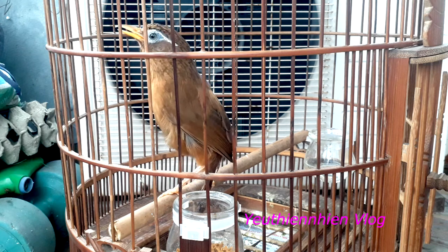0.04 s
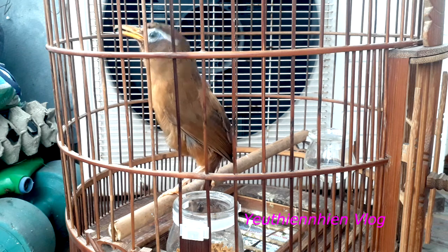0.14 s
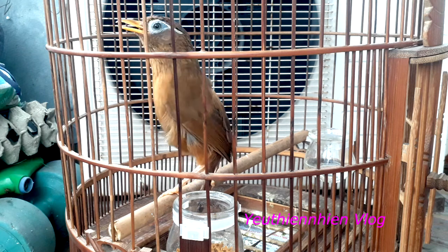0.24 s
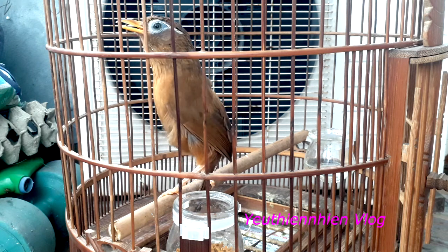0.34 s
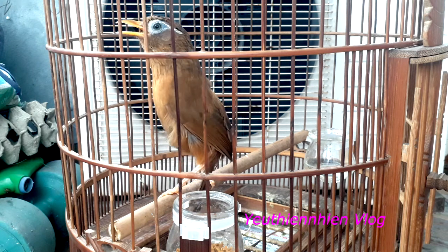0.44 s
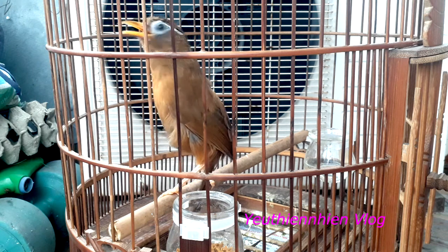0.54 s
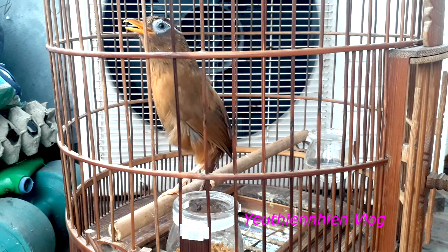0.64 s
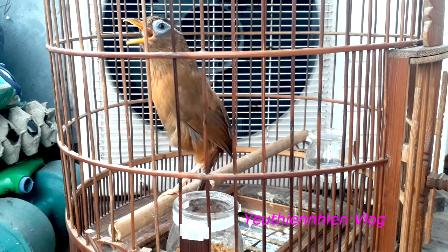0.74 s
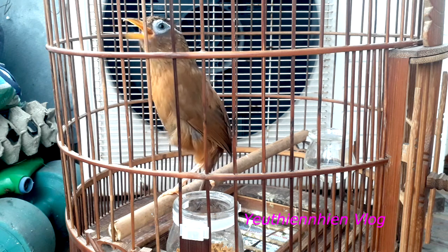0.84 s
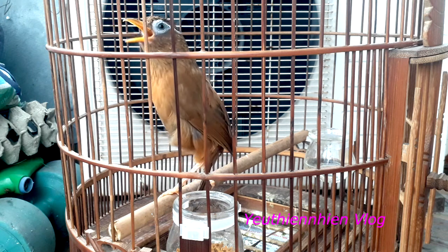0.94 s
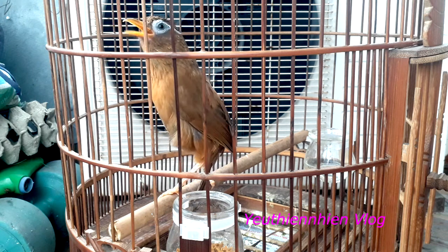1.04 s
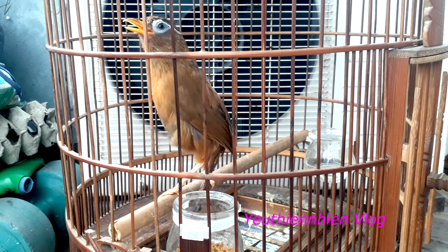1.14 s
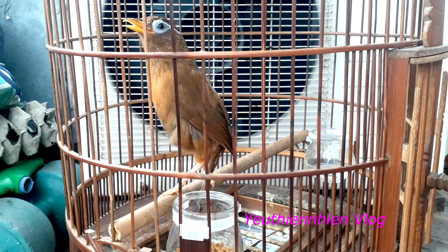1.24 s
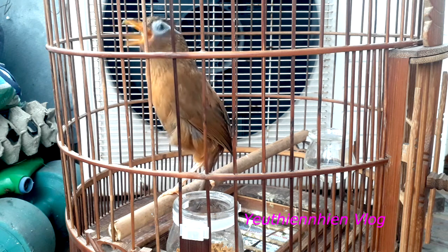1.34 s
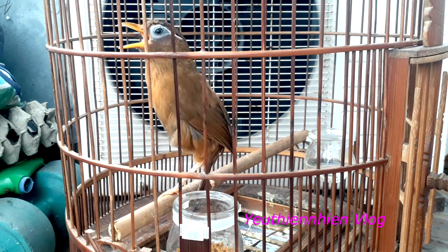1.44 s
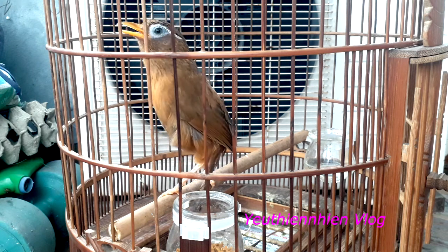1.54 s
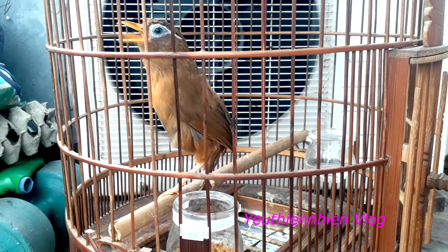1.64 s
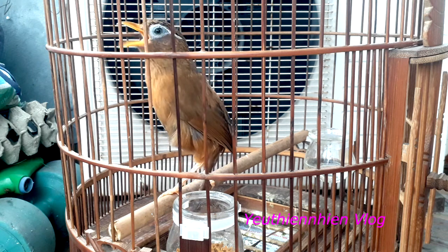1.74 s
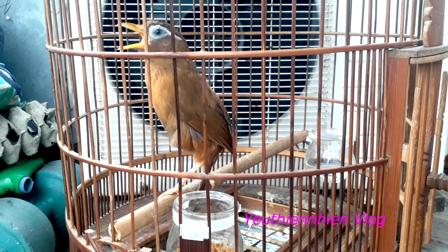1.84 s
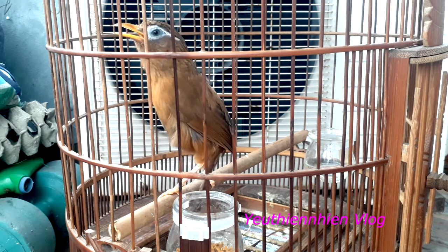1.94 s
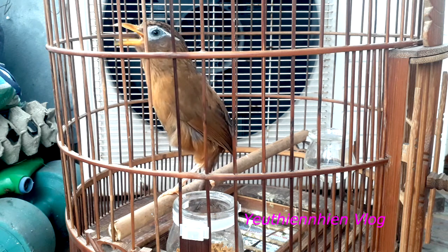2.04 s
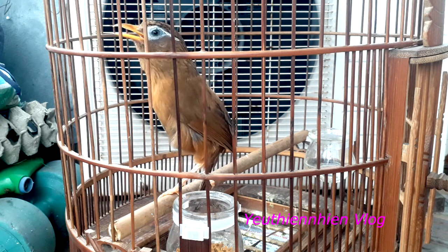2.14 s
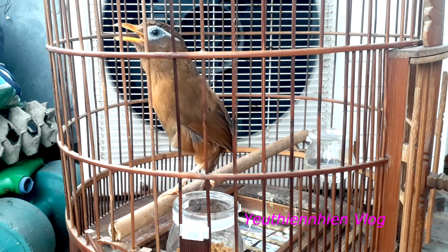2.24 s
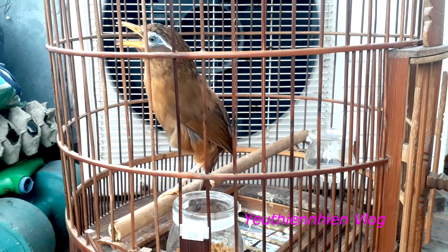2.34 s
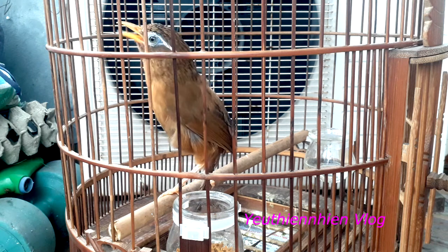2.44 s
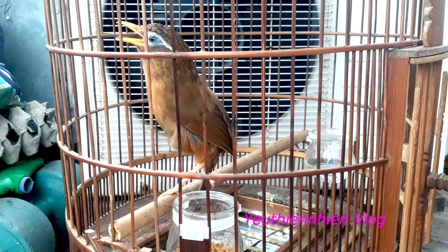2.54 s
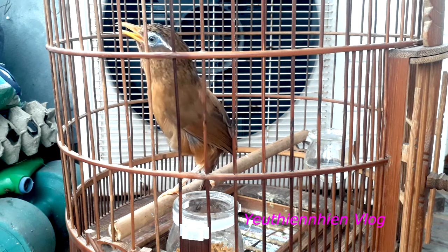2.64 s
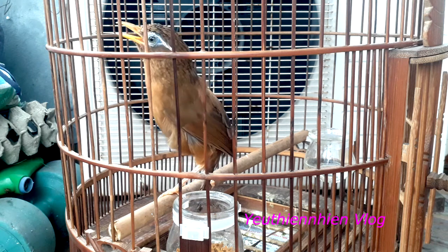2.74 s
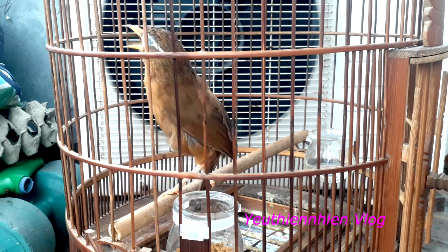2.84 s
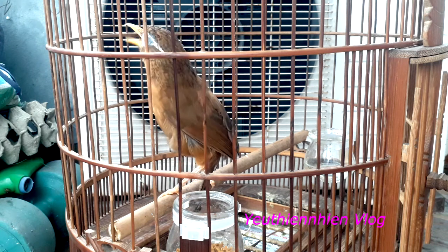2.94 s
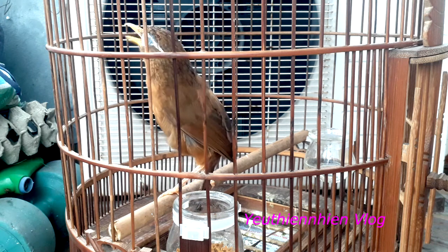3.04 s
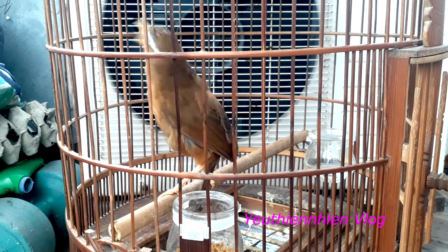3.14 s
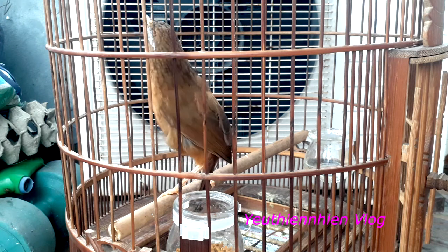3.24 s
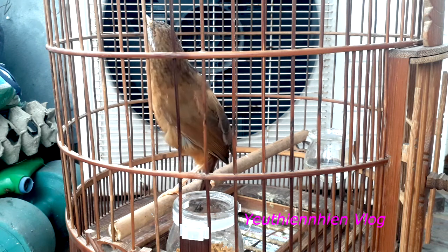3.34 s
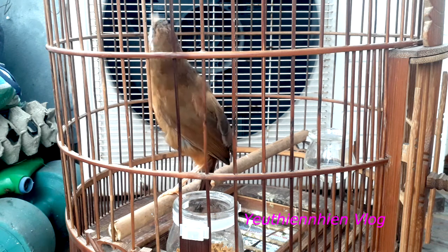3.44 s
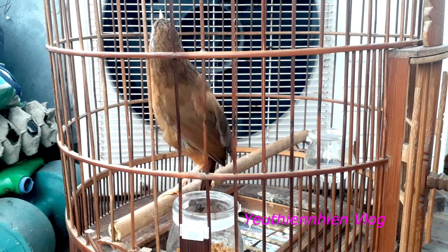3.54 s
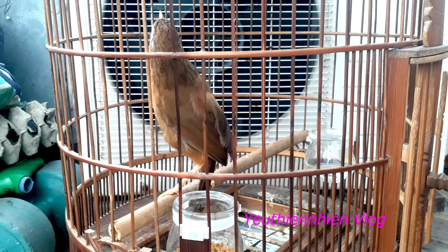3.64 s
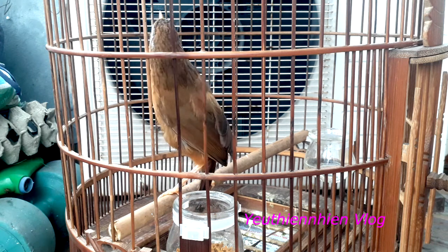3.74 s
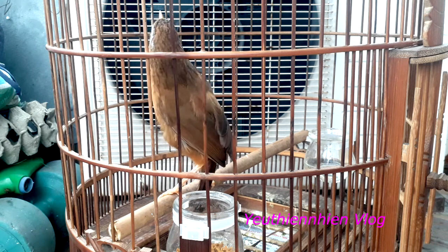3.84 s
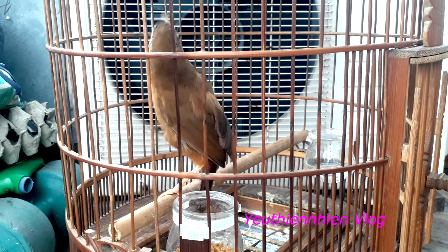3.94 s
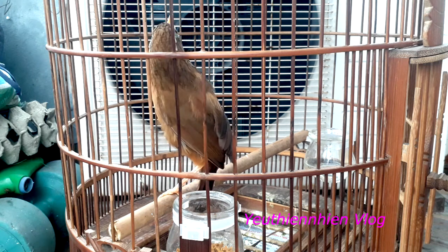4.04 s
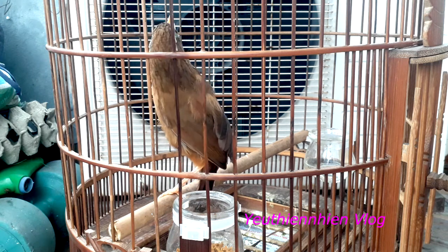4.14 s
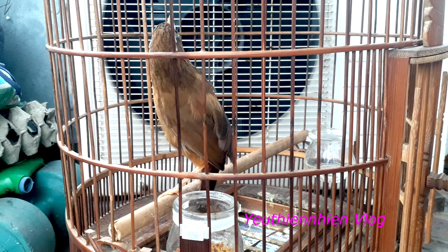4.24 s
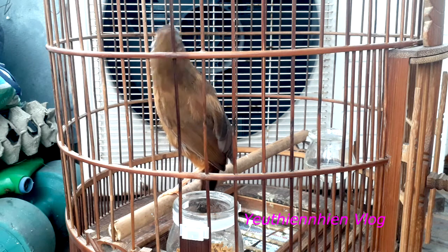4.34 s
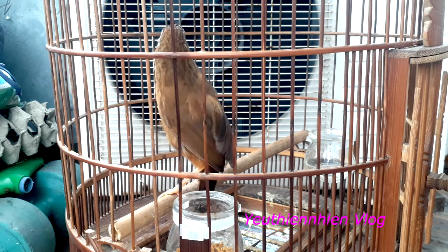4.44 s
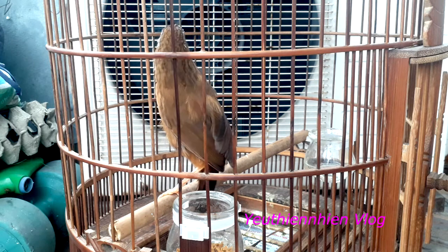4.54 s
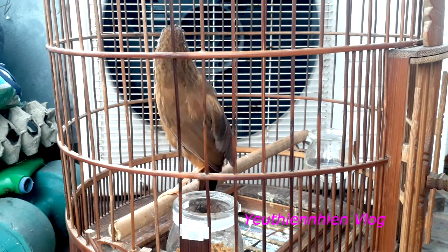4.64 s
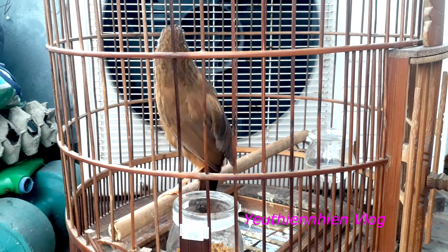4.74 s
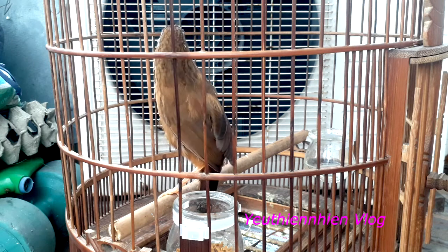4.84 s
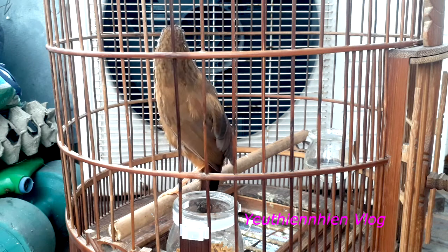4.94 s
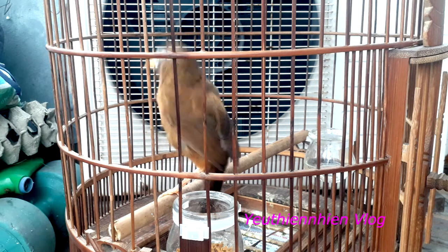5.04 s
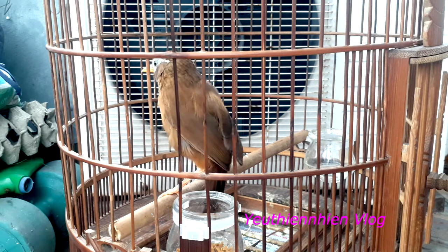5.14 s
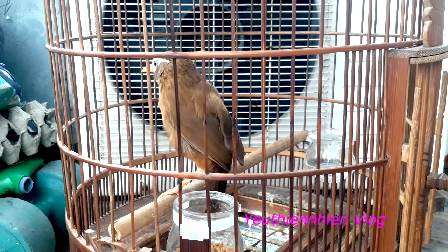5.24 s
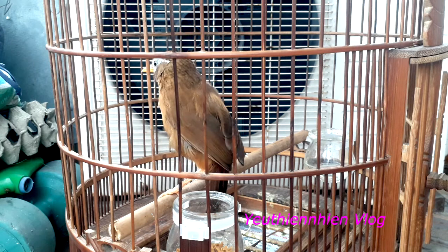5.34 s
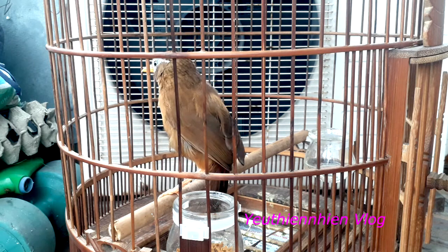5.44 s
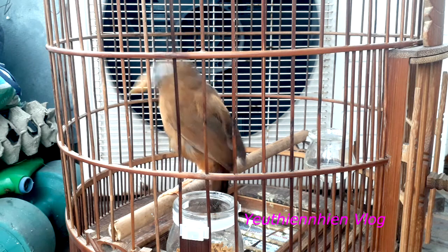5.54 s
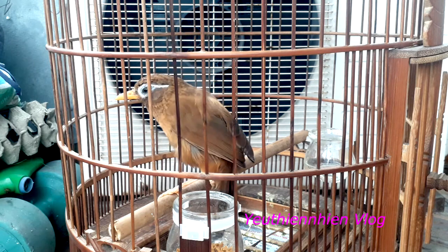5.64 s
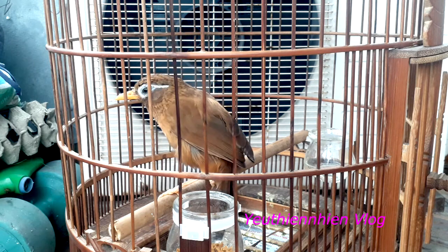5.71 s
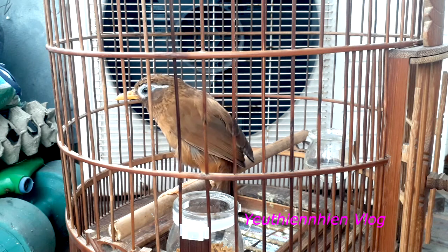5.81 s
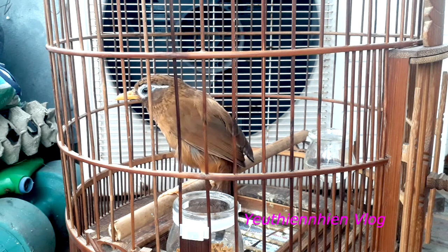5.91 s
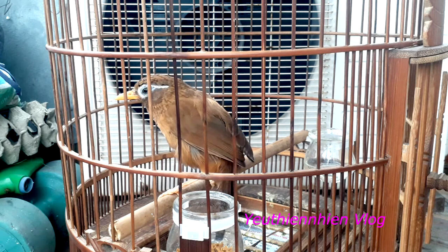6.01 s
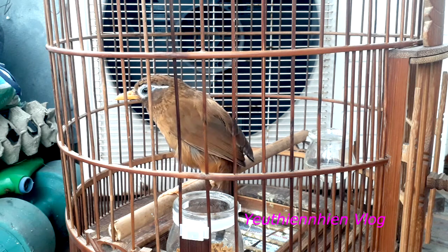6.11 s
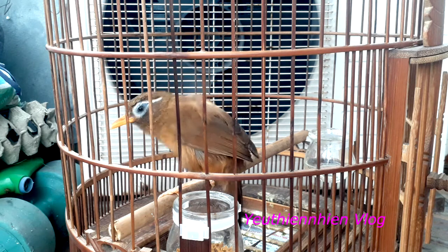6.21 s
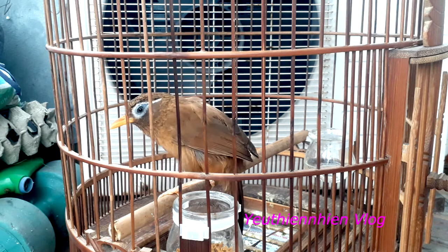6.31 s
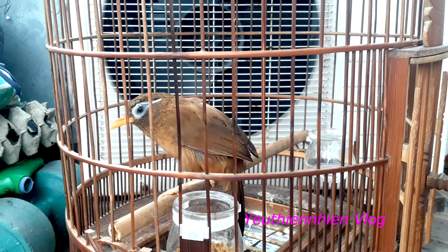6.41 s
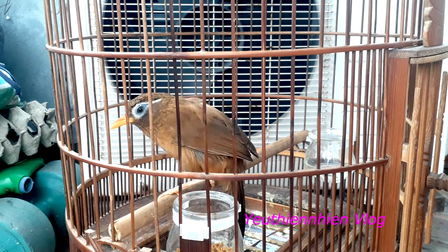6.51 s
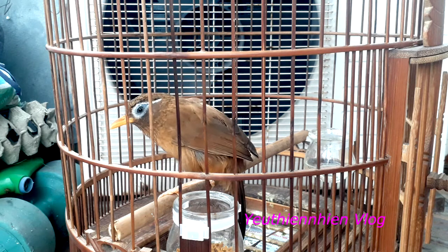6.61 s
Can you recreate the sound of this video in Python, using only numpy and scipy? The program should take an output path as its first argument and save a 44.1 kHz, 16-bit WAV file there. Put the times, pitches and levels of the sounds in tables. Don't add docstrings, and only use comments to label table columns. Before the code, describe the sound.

Loud, piercing birdsong fills the first two thirds: about twenty short whistles, sliding up and down, buzzing and fluttering, separated by tiny gaps and slapping off nearby hard walls. Thin far machine whines hide beneath. Then the singer falls silent and the soft street rumble is exposed, a distant bird warbles and others chirp in echo, an engine murmurs far away, and claws tick on a dry perch. Mono, close phone pickup.

```python
import sys
import numpy as np
from scipy import signal
from scipy.fft import rfft, irfft
from scipy.io import wavfile
from scipy.ndimage import uniform_filter1d, minimum_filter1d

SR = 44100
rng = np.random.default_rng(int(sys.argv[2]) if len(sys.argv) > 2 else 0)


def undo_db(level):
    steps = np.asarray(level, float) / 20
    return 10 ** steps


def wrap_up_sound(samples):
    columns = np.atleast_2d(samples).T
    tamed = np.clip(columns, -1, 1)
    steps = np.round(tamed * 32767).astype(np.int16)
    wavfile.write(sys.argv[1], SR, steps)


N = 294147
TOP_HZ = 15700


def level(x, db):
    return x * undo_db(db) / np.sqrt(np.mean(x ** 2))


def walk(rate):
    k = int(SR / rate)
    held = np.repeat(rng.standard_normal(N // k + 1), k)
    return 1.3 * uniform_filter1d(uniform_filter1d(held, k), k)[:N]


def colour(x, shape):
    hz, db = np.transpose(shape)
    f = np.maximum(np.arange(N // 2 + 1) * SR / N, 1)
    return irfft(rfft(x) * undo_db(np.interp(np.log(f), np.log(hz), db)), N)


def tail(x, t60, rise):
    t = np.arange(SR) / SR
    answer = rng.standard_normal(SR) * (1 - np.exp(-t / rise)) * undo_db(-60 * t / t60)
    return signal.fftconvolve(x, answer / np.sqrt(np.sum(answer ** 2)))[:N]


def town():
    # time in seconds, rumble in dB.
    traffic = [(0, -49.5), (.6, -51), (1.2, -51), (1.701, -51), (2.1, -50), (2.699, -52), (3.599, -51),
               (4.6, -50.5), (5.199, -50), (5.599, -49), (6, -48.5), (6.3, -48.5), (6.67, -48.5)]
    # frequency in Hz, density in dB per Hz.
    spectrum = [(15, -14), (40, -10), (120, 1), (190, -6), (250, -3), (380, -9), (650, -11), (1100, -12),
                (1700, -18), (2400, -19), (3300, -24), (4500, -30), (7000, -35), (9000, -39), (15500, -41)]
    s, rumble_db = np.transpose(traffic)
    swell = np.interp(np.arange(N) / SR, s, rumble_db - np.median(rumble_db))
    noise = level(colour(rng.standard_normal(N), spectrum), -49)
    out = 0
    for hz in 30 * 2. ** np.arange(10):
        band = colour(noise, [(hz / 2, -60), (hz / 3.47, -20), (hz, 0), (hz * 1.9, -2), (hz * 2, -60)])
        out = out + band * undo_db(swell * 2.7 / (1 + hz / 900) + 0.61 * walk(7.6))
    return out


def starting_blip():
    u = np.arange(600) / 600
    phase = 2 * np.pi * np.cumsum(2228 * (.9 + .16 * u)) / SR
    return np.sin(np.pi * u) * (np.sin(phase) + 0.075 * np.sin(2 * phase))


def thrush():
    # kind, start in seconds, length in seconds, low and high Hz of the loud second
    song = [("swell", .098, .1, 1560, 1860, 1.3), ("swell", .3, .278, 1515, 2170, .9),
            ("climb", .68, .165, 1980, 3340, 1.1), ("glide", 0.9128, .209, 1954, 3060, 0.95),
            ("hold", 1.354, .183, 1620, 3244, 0.87), ("rise", 1.61, 0.1, 1830, 2580, 0.52),
            ("hold", 1.749, .195, 1720, 3235, 1), ("dip", 2.053, 0.2, 1930, 2850, 1),
            ("plunge", 2.337, 0.095, 1840, 3300, 0.93), ("dip", 2.518, .202, 1900, 2790, 0.88),
            ("plunge", 2.799, .083, 1760, 3320, 1), ("rise", 2.919, .104, 2120, 2740, 1.4),
            ("plunge", 3.073, .089, 1730, 3260, 1), ("rise", 3.197, .113, 2070, 2690, 1.4),
            ("slide", 3.364, 0.14, 2100, 3200, 1), ("arch", 3.59, 0.16, 1960, 2240, 1.2),
            ("rise", 3.829, 0.12, 2280, 2650, 1.9), ("slide", 4.027, .15, 2150, 3070, 0.95),
            ("rise", 4.271, 0.078, 2740, 2975, 0.2), ("arch", 4.392, .208, 2350, 2680, 0.77)]
    # multiple of the membrane rate, level in dB.
    partials = [(1, -33), (2, 2.5), (3, -24.5), (4, -23.5), (5, -33.5), (6, -38), (7, -41), (8, -41),
                (9, -30.5), (10, -33.5), (11, -37), (12, -51)]
    # frequency in Hz, density in dB per Hz.
    breath = [(1500, -36.5), (3000, -7.5), (4200, -7.5), (5500, -28.5), (7000, -19), (8400, 0), (9800, -21),
              (10600, -34.5), (11600, -16.5), (13000, -28), (14800, -18), (15700, -11)]
    # frequency in Hz, density in dB per Hz.
    torn_air = [(2500, -20), (3800, 0), (7000, 0), (9500, -12), (15000, -18)]
    # frequency in Hz, gain in dB.
    throat = [(1100, -26), (1400, 2), (1600, 0), (3300, 0), (3700, 1)]
    # frequency in Hz, gain in dB.
    beak = [(1000, -2), (1600, -0.5), (3000, 13), (4500, -5), (5500, -5.5), (6500, 0), (7500, -2),
            (8500, 3), (10500, 0), (13000, -8.5), (15000, -15)]
    shapes = { "swell": [(0, 0, -12.5, 3.8), (.1, .1, -5, 4.5), (.25, .25, -3, 6.5), (.4, .8, 0.5, 2.6),
              (.85, 0.95, 1, 2.8), (1, .45, -2.5, 4.5)], "climb": [(0, 0, -17, 2), (.07, .19, -5.5, 3.2),
              (.2, .41, 1, 1.8), (.45, .47, -2, 2.5), (.68, .75, 1.5, 2), (1, 0.95, -4, 5.2)],
              "rise": [(0, 0, -15, 3), (.18, .1, -0.5, 1.9), (.42, .6, -2, 1.323), (.66, .95, 2, 1.2),
              (1, 0.97, -4, 1.9)], "glide": [(0, 0.97, -19.5, .8), (.06, .93, 2.5, .75),
              (.13, .86, -1, .25), (.32, .61, -2, 1.1), (.49, .51, -1, 1), (1, 0.032, -3.5, 3.65)],
              "hold": [(0, 0.93, -6, 3), (.06, .92, 1, 2.3), (.42, .94, 2.5, 1.7), (.64, 1.01, -2.5, .4),
              (.77, .84, 0, 1), (.945, .25, -4.5, 1.2), (1, 0.0062, -13, 1.5)], }
    other_shapes = { "dip": [(0, 0.95, -11.5, 1.5), (.04, 1, -1, .5), (.2, 0.94, 1, .6),
                    (.48, .24, -1, 2.7), (.65, 0, -3, 3.5), (.85, 0.087, -2.5, 3.1), (1, .65, -2, 2.5)],
                    "plunge": [(0, 1.03, -11.5, 2.6), (.13, 1, -2.5, 3.6), (.4, .98, -2.5, 1.8),
                    (.7, .88, 2, 1.1), (.83, .8, 4, 1.3), (1, 0.0094, -14, 1.5)],
                    "slide": [(0, 0.95, -15.5, 3), (.07, 0.97, -0.5, 3), (.25, .93, 0, 1.4),
                    (.5, .65, 0, 1.4), (.75, .33, -4.5, .9), (.93, .1, 1, 2.2), (1, 0, -2, 2.2)],
                    "arch": [(0, -0.703, -12, 2.937), (.08, .6, -3, 1.6), (.22, 1, 0.5, 1.1),
                    (.45, .85, -1, 2.3), (.72, .4, -1, 2.7), (.9, .25, -1, 2.3), (1, 0, -8.5, 2.89)], }
    voices = {"swell": (189, 1.1, 2.5, 0, 3), "climb": (118, .75, 4.5, -1.5, -0.5),
              "glide": (203, 0.6, 3, -.5, 0), "hold": (115, 0.27, -4.5, -.5, -3),
              "rise": (185, .3, -2.5, 1.5, -2), "dip": (168, 0.34, 2, -0.5, -1.5),
              "plunge": (122, 0.3, 0, .3, 2), "slide": (140.5, 0.18, -4.5, -0.5, -2),
              "arch": (183.5, 0.66, 2.5, 1, -1)}
    shut_hz, open_hz = 2150, 2850
    turn_s = 3.24

    low, high, wander, quiver = np.zeros(N), np.zeros(N), walk(70), walk(600)
    hiss = rng.standard_normal(N)
    air = level(colour(hiss, breath), -27.5)
    rasp = level(colour(hiss[::-1], torn_air), -22.5)
    blip = starting_blip()
    courses = {**shapes, **other_shapes}
    for kind, start, length, low_hz, high_hz, rough in song:
        note_db = -9 + 3 * (high_hz - 2765) / 1000
        clean = 1 - rough
        rate_hz, uneven, breath_db, bright_db, deep_db = voices[kind]
        share, *columns = np.transpose(courses[kind])
        i = np.arange(int(start * SR), int((start + length) * SR))
        u = (i / SR - start) / length
        span, db, depth = (uniform_filter1d(np.interp(u, share, c), size=100) for c in columns)
        hz = low_hz + (high_hz - low_hz) * span
        db = db + note_db
        turned = max(start - turn_s, 0)
        depth = rough * np.maximum(depth, 0) / 100
        uneven = min(rough * uneven, 1)

        cycle = 2 * np.pi * np.cumsum(rate_hz * (1 + .4 * uneven * wander[i])) / SR
        slide = np.sin(cycle) + 0.86 * np.sin(2 * cycle) + 1.36 * uneven * quiver[i]
        choke = 1 - np.minimum(30 * depth, .97) * (.5 + .5 * np.cos(cycle)) ** 2.09
        phase = np.pi * np.cumsum(hz * (1 + depth * slide)) / SR
        parts = []
        for k, g in partials:
            waver_db = 3.63 * (k != 2) * wander[(i + 9000 * k) % N]
            parts.append(undo_db(g + waver_db) * (k * hz < 2 * TOP_HZ) * np.sin(k * phase))

        edges = np.minimum(1, np.minimum(i - i[0], i[-1] - i) / (0.0072 * SR))
        flow = 1.25 * edges * undo_db(db) * choke
        gape = np.clip((hz - shut_hz) / (open_hz - shut_hz), 0, 1)
        leak_db = breath_db - 0.5 * clean - 8 * turned - 17 * gape
        overtone_db = bright_db + clean + 9 * (gape - 1) + 0.14 * (db + 5)
        tearing = uneven ** 2 * np.clip((hz - shut_hz) / 1000, 0, 1) ** 2
        low[i] += flow * (parts[1] + undo_db(leak_db) * air[i] + tearing * rasp[i])
        high[i] += flow * (undo_db(overtone_db) * sum(parts[2:]) + undo_db(deep_db) * parts[0])
        if hz[0] > 2600:
            k = int((start - 0.0089) * SR)
            low[k:k + len(blip)] += undo_db(note_db - 16 + 8.5 * turned) * blip
    return colour(low, throat) + colour(high, beak)


def porch(x):
    # delay in seconds, level in dB.
    echoes = [(.0031, -8.5), (.0085, -10.5), (0.016, -6.5), (0.028, -23.5), (0.044, -17)]
    # frequency in Hz, gain in dB.
    echo_tone = [(3000, -2.5), (6000, 1), (12000, 1.5)]
    near = sum(undo_db(db) * np.roll(x, int(s * SR)) for s, db in echoes)
    close_tail = undo_db(-7.5) * tail(x, 0.23, rise=0.00802)
    yard_tail = undo_db(-25) * tail(x, .9, rise=0.0169)
    return x + colour(near + close_tail + yard_tail, echo_tone)


def whines():
    # start in seconds, length in seconds, pitch in Hz, level in dB.
    tones = [(2.9, 2.5, 1320, -57), (1.9, .5, 900, -56), (1.9, 4.7, 980, -58), (1.6, .9, 610, -54),
             (5.35, .45, 1430, -54), (5.55, .37, 1170, -56), (.6, .7, 730, -61), (1.2, .8, 1140, -62),
             (6.34, .4, 150, -43), (6.03, .28, 285, -49), (.95, .4, 135, -47), (1.9, .5, 130, -51),
             (3, 1.8, 250, -56)]
    t = np.arange(N) / SR
    out = np.zeros(N)
    for s, length, hz, db in tones:
        fade = np.clip(np.minimum(t - s, s + length - t) / .06, 0, 1)
        phase = 2 * np.pi * np.cumsum(hz * (1 + .008 * walk(3))) / SR
        out += undo_db(db) * (.7 + .7 * walk(18)) * fade * np.sin(phase)
    return out


def far_birds():
    # start in seconds, length in seconds, start Hz, level in dB.
    chirps = [(1.27, .07, 7000, -58), (4.63, .08, 6900, -55), (4.74, .15, 6900, -59),
              (5.865, .11, 7100, -54), (6.06, .1, 7300, -54), (6.54, .06, 6800, -52), (6.6, .07, 6000, -49)]
    # start in seconds, length in seconds, start Hz, end Hz, level in dB.
    warbler = [
        (5.095, .05, 2500, 4500, -45),
        (5.14, .12, 3850, 3720, -46),
        (5.3, .07, 2400, 2350, -56),
        (5.4, .1, 2100, 2800, -54),
        (5.465, .07, 3380, 3330, -48),
        (5.52, .14, 2950, 2720, -45),
    ]
    out, quaver = np.zeros(N), walk(150)
    calls = [(s, length, hz, .77 * hz, db, .05 * hz) for s, length, hz, db in chirps]
    calls += [(*row, 80 + .25 * abs(row[3] - row[2])) for row in warbler]
    for s, length, from_hz, to_hz, db, trill in calls:
        i = np.arange(int(s * SR), min(int((s + length) * SR), N))
        u = (i / SR - s) / length
        hz = from_hz + (to_hz - from_hz) * np.abs(u) ** 0.79 + trill * quaver[i]
        swell = np.sqrt(np.abs(np.sin(np.pi * u)))
        out[i] += undo_db(db) * swell * np.sin(2 * np.pi * np.cumsum(hz) / SR)
    return .5 * out + 1.8 * tail(out, .75, rise=.006)


def motor():
    # time in seconds, firing rate in Hz, level in dB.
    revs = [(4.999, 123.5, -60.5), (5.2, 129.7, -52.5), (5.45, 117.1, -59.5), (5.7, 124.9, -50),
            (5.9, 128.7, -48.5), (6.1, 123.8, -45), (6.3, 112.7, -56), (6.4, 107.2, -50),
            (6.67, 107.5, -50)]
    t = np.arange(N) / SR
    s, *columns = np.transpose(revs)
    hz, db = (np.interp(t, s, c) for c in columns)
    phase = 2 * np.pi * np.cumsum(hz * (1 + 0.011 * walk(23))) / SR
    drone = sum(undo_db(g + 4.2 * walk(20)) * np.sin(k * phase) for k, g in [(1, 3), (2, 0.5), (3, -23.5)])
    return drone * undo_db(db + 1) * np.clip(5 * (t - s[0]), 0, 1)


def perch():
    # start in seconds, peak in dB.
    ticks = [
        (6.352, -36.5),
        (6.356, -26),
        (6.359, -26.5),
        (6.374, -31),
    ]
    out, t = np.zeros(N), np.arange(400) / SR
    for s, db in ticks:
        k = int(s * SR)
        out[k:k + 400] += undo_db(db) * 0.53 * rng.standard_normal(400) * np.exp(-t / 0.0021)
    return colour(out, [(800, -20), (2500, -3), (7500, -2.5), (12000, -14.0)])


def scene():
    return (porch(thrush()) + far_birds() + perch() + motor() + whines() + town())[None]


def low_pass(x):
    return signal.sosfilt(signal.butter(12, 15710, fs=SR, output="sos"), x)


def record(dry):
    heard = signal.sosfilt(signal.butter(2, 55, "high", fs=SR, output="sos"), dry)
    room = minimum_filter1d(np.minimum(1, .995 / (np.abs(heard) + 1e-9)), size=120)
    held = heard * uniform_filter1d(room, size=60)
    cut = signal.sosfilt(signal.ellip(12, .05, 40, TOP_HZ, fs=SR, output="sos"), held)
    return low_pass(cut - .0006)


dry = scene()
out = record(dry)
wrap_up_sound(out)
```